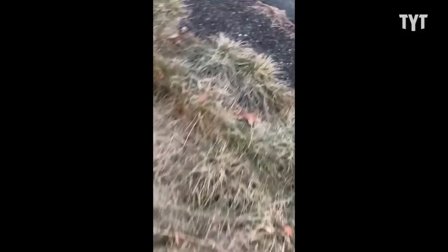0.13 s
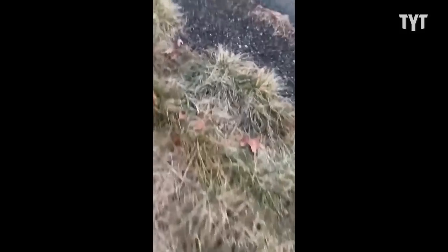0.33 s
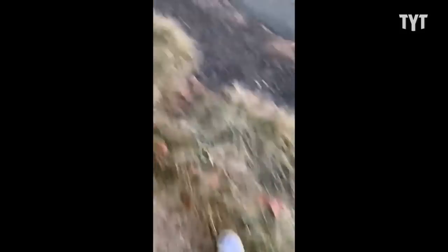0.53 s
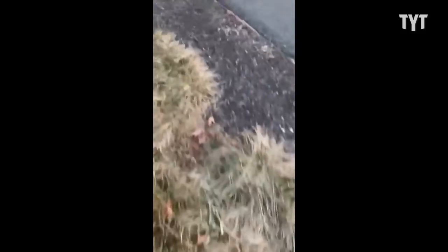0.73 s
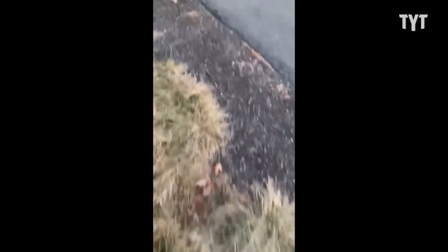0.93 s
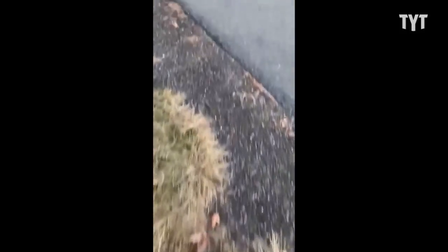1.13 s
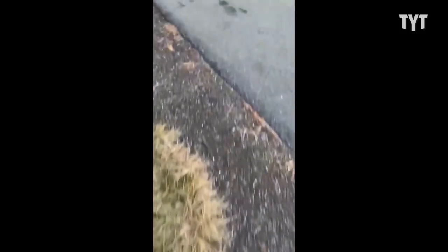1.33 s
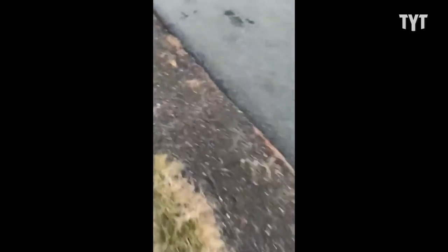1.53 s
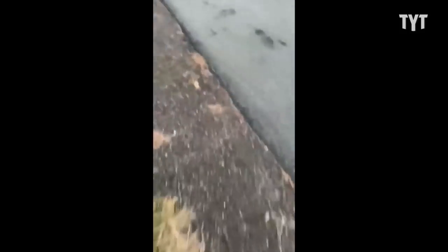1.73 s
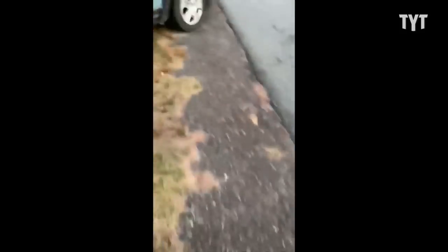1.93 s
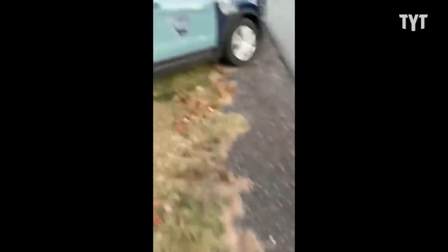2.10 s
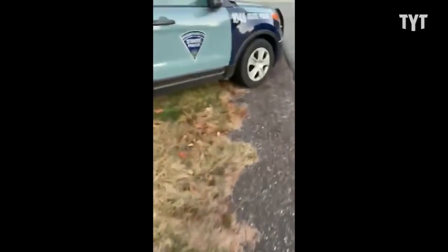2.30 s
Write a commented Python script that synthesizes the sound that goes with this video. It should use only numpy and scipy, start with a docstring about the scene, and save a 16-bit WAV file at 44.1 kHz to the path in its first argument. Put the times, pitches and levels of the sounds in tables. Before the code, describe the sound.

Busy highway traffic, cutting in abruptly at 0.1 s after silence. Deep, lumpy rumble and breeze run under steady tyre roar. Dry grass swishes and crackles underfoot, strongest around 0.6, 1.0-1.25, 1.7 and 2.25 s. A faint low engine drone swells near 0.4 s, others around 1.5, 1.85 and 2.2 s. From 1.1 s a vehicle's roar swells left, drifting slightly right after 2.1 s.

```python
"""A walker stands in roadside grass close to a busy highway, with a hand-held two-port microphone.
After a moment of silence the sound cuts in abruptly: far traffic and breeze as deep lumpy noise, tyre roar as
noise humped near 700 Hz, and feet in dry grass as clicks over a swish. Engine drones, narrow wavering tones,
swell and fade, one early and three later. Past one second the lower roar of a vehicle swells and swings
to the left, then drifts back to slightly right; the upper roar of all lanes stays put."""
import sys
import numpy as np
from scipy import signal
from scipy.fft import rfft, irfft, next_fast_len
from scipy.io import wavfile

SR = 44100
rng = np.random.default_rng(int(sys.argv[2]) if len(sys.argv) > 2 else 0)


def persist_wave(psi):
    """Save psi, clipped to +-1, as 16-bit WAV."""
    counts = np.round(np.clip(psi, -1, 1) * 32767).astype(np.int16)
    wavfile.write(sys.argv[1], SR, np.atleast_2d(counts).T)


def undo_db(level):
    """Turn decibels back into plain size, where 20 dB means ten times bigger."""
    steps = np.asarray(level, float) / 20
    return 10 ** steps


N = 108441
SIZE = next_fast_len(N)
HZ = np.arange(SIZE // 2 + 1) * SR / SIZE + 1e-3   # the small offset keeps the logarithm finite

START_S, OPENING_S = .1028, 0.00049   # end of the silence, length of the fade-in

# Far traffic and breeze. Each row: time in seconds, level in dB before a small trim.
RUMBLE_LEVEL = [(0.11, -27), (0.14, -30.5), (0.64, -28.5), (0.66, -30), (1.25, -28.5), (1.28, -30),
                (1.42, -26), (1.96, -28.5), (2.13, -31.5), (2.19, -27), (2.21, -31), (2.45, -31.5)]
# Spectrum of the far rumble. Each row: frequency in Hz, relative density in dB per Hz.
RUMBLE_COLOUR = [(11, -50), (25, -22), (36, -17), (54, -1), (119, -2), (151, 0.5), (331, -7), (376, -7.5),
                 (409, -11), (520, -16), (680, -65), (1140, -120)]

# Lower tyre roar of the near vehicle. Each row: time in seconds, level in dB before a fixed lift,
# left over right in dB.
VEHICLE_PASS = [(0.11, -39.5, -5), (0.16, -43, -2), (0.5, -43.5, 3), (0.64, -40, 0.5), (0.78, -43, 0.5),
                (1.13, -36.5, 5.5), (1.24, -34, 4), (1.32, -38, 5), (1.63, -36, 6), (1.9, -37.5, 3.5),
                (2.08, -39, 0), (2.25, -38, -1), (2.45, -37.5, -2)]
# Upper tyre roar from many tyres in all lanes. Each row: time in seconds, level in dB before a fixed lift,
# sizzle of the tread in dB, used relative to its mean.
ALL_LANES = [(0.11, -44.5, 0.5), (0.27, -47, 2), (0.6, -45.5, 4), (0.85, -45.5, 2.5), (1.11, -44.5, 4),
             (1.4, -45.5, 1.5), (1.68, -43, 1.5), (1.84, -45.5, 1), (2.1, -45, 0.5), (2.3, -45, 2.5),
             (2.45, -47, 4.5)]
# Spectrum of the tyre roar. Each row: frequency in Hz, relative density in dB per Hz.
ROAR_COLOUR = [(300, -75), (450, -16.5), (560, -5.5), (690, -1), (900, -5), (1300, -11.5), (1600, -10),
               (1900, -10), (2500, -16), (3200, -21), (4500, -28.5), (6500, -30.5), (8000, -49),
               (12000, -64)]
PAN_TOP_HZ = 790        # only the roar below this swings from side to side
ALL_LANES_PAN_DB = -1   # left over right: the upper roar leans right
SIZZLE_HZ, SIZZLE_WIDTH_HZ = 2320, 250

# Pressure of the stride in dry grass. Each row: time in seconds, level in dB before a fixed lift.
STRIDE = [(0.11, -45.5), (0.19, -49.5), (0.27, -62), (0.32, -56.5), (0.39, -62.5), (0.48, -66),
          (0.5, -55.5), (0.63, -44.5), (0.66, -50.5), (0.83, -49.5), (0.87, -56), (0.98, -59.5),
          (1.01, -46), (1.05, -51), (1.1, -44), (1.14, -48.5), (1.24, -43), (1.43, -56), (1.6, -60.5),
          (1.63, -47), (1.66, -51), (1.68, -43), (1.73, -47.5), (1.77, -55), (1.81, -50), (1.93, -69),
          (2.25, -48), (2.34, -50.5), (2.39, -59), (2.45, -55)]
# Spectrum of the grass. Each row: frequency in Hz, relative density in dB per Hz.
GRASS_COLOUR = [(1200, 2), (2500, 0.5), (4000, -1.5), (5500, 0.5), (7500, 1.5), (9500, 5), (11500, 2),
                (13000, -14.5)]
SNAPS_PER_S = 4000      # typical rate on each side; it wanders
SNAP_SPREAD_DB = 3.5    # mean of the exponential spread of snap sizes, before its cap
SWISH_DB = -0.5         # smooth swish relative to the snaps

# Engine drones. Each row: pitch in Hz, width of its waver in Hz, time of the peak in seconds,
# spread of the swell in seconds, peak level in dB about which it wanders.
ENGINE_DRONES = [(161.5, 1.5, 1.49, 0.38, -37.5), (378, 9.2, 1.855, 0.19, -38),
                 (146, 3.7, 2.19, 0.15, -38.5), (143, 4.05, 0.41, .2, -41)]

# Left-right likeness of the noise by frequency. Each row: frequency in Hz, likeness from 0 to 1.
LIKENESS = [(60, 1), (120, 1), (170, 1), (250, 0.98), (310, 0.98), (460, 0.84), (690, 0.43), (1100, 0.42),
            (1600, 0.56), (2400, 0.48), (3400, 0.26), (4200, 0.52), (4800, 0.5), (5300, 0.5), (6300, 0.5),
            (8000, 0.1), (12000, 0.47)]
# Stereo phase of the noise by frequency. Each row: frequency in Hz, left minus right in radians.
STEREO_PHASE = [(250, 0), (690, -.6), (1120, .1), (2070, 1.2), (2580, 2.6), (3100, .9), (3360, .2),
                (3960, 3.0), (5340, 3.2), (5940, 5.9), (7000, 6.2), (12000, 6.3)]


def rms_one(x):
    """Scale to rms 1, over both channels together if there are two."""
    return x / np.sqrt(np.mean(x ** 2) + 1e-20)


def in_time(rows):
    """Columns of a table as straight lines in time."""
    s, *columns = np.transpose(rows)
    return [np.interp(np.arange(N) / SR, s, c) for c in columns]


def at_hz(points):
    """A table of (Hz, value) read at every frequency, straight over log frequency."""
    hz, value = np.transpose(points)
    return np.interp(np.log(HZ), np.log(np.maximum(hz, 1)), value)


def drift(rate):
    """Slow chance of spread 1: noise through two equal low-pass poles at rate in Hz."""
    # made at every 40th sample, after a run-in of 2000 steps
    r = np.exp(-80 * np.pi * rate / SR)
    slow = signal.lfilter([1], [1, -2 * r, r * r], rng.standard_normal(N // 40 + 2002))[2000:]
    slow = rms_one(slow - slow.mean())
    return np.interp(np.arange(N) / 40, np.arange(len(slow)), slow)


def stereo_pair(shared, other):
    """Left and right spectra: a shared part plus an unrelated part in opposition, turned apart in phase."""
    alike = np.clip(at_hz(LIKENESS), 0, 1)
    common = np.sqrt(1 + alike) * rfft(shared, SIZE)
    opposed = np.sqrt(1 - alike) * rfft(other, SIZE)
    turn = np.exp(.5j * at_hz(STEREO_PHASE))   # half the phase to each side
    return np.array([(common + opposed) * turn, (common - opposed) / turn])


def patchy(spectra, colour, patchy_db, rate):
    """Colour the pair, then let overlapping half-octave bands flicker, partly together; rms 1."""
    shaped = spectra * undo_db(at_hz(colour))
    together = drift(rate / 2)
    lowest, highest = np.log2(colour[0][0]) // 1, np.log2(colour[-1][0]) + 1
    out = 0
    for centre in np.arange(lowest, highest, .5):   # in octaves above 1 Hz
        window = np.cos(np.pi * np.clip(np.log2(HZ) - centre, -.5, .5)) ** 2
        band = irfft(shaped * window, SIZE)[:, :N]
        out = out + band * undo_db(patchy_db * (.5 * together + drift(rate)))
    return rms_one(out)


def rumble():
    """Far engines and breeze merge into deep, lumpy noise."""
    db, = in_time(RUMBLE_LEVEL)
    noise = stereo_pair(*rng.standard_normal((2, N)))
    return undo_db(db - 0.27) * patchy(noise, RUMBLE_COLOUR, patchy_db=-0.16, rate=13.6)


def tyre_roar():
    """Tread noise humped around 700 Hz; its lower part swells and moves across as the vehicle goes by."""
    db, pan_db = in_time(VEHICLE_PASS)
    upper_db, sizzle_db = in_time(ALL_LANES)
    noise = stereo_pair(*rng.standard_normal((2, N)))
    roar = rfft(patchy(noise, ROAR_COLOUR, patchy_db=1.15, rate=23.0), SIZE)
    # three shares of the spectrum that add up to the whole
    low_share = 1 / (1 + (HZ / PAN_TOP_HZ) ** 8)
    sizzle_share = np.exp(-.5 * ((HZ - SIZZLE_HZ) / SIZZLE_WIDTH_HZ) ** 2)
    upper_share = 1 - low_share - sizzle_share
    low, sizzle, upper = (irfft(roar * share, SIZE)[:, :N] for share in (low_share, sizzle_share, upper_share))
    upper = rms_one(upper + sizzle * undo_db(sizzle_db - sizzle_db.mean())) * undo_db(4.0)
    sides = np.array([[.5], [-.5]])   # left, right
    all_lanes = upper * undo_db(upper_db + ALL_LANES_PAN_DB * sides)
    vehicle = low * undo_db(db + 5.5 + pan_db * sides)
    return all_lanes + vehicle


def grass():
    """Blades snap in dense uneven clicks over a smooth swish, both under the stride."""
    db, = in_time(STRIDE)
    sizes_db = SNAP_SPREAD_DB * np.minimum(rng.exponential(1, (2, N)), 5)
    sizes = undo_db(sizes_db) * rng.choice([-1, 1], (2, N))
    snap_chance = SNAPS_PER_S * undo_db(3.0 * drift(25.0)) / SR   # per sample
    snaps = sizes * (rng.random((2, N)) < snap_chance)
    blades = rms_one(snaps) + undo_db(SWISH_DB) * rng.standard_normal((2, N))
    return undo_db(db + 4.5) * patchy(stereo_pair(*blades), GRASS_COLOUR, patchy_db=0.46, rate=54.0)


def drones():
    """Each engine is a narrow wavering tone that swells and fades, the same left and right."""
    out, s = 0, np.arange(N) / SR
    for hz, width_hz, at, over, db in ENGINE_DRONES:
        pitch_hz = hz + width_hz / 2 * drift(6.3)
        phase = 2 * np.pi * (np.cumsum(pitch_hz) / SR + rng.random())
        tone = np.sqrt(2) * np.sin(phase)   # rms 1
        swell = np.exp(-.5 * ((s - at) / over) ** 2)
        out = out + undo_db(db + 1.35 * drift(4.7)) * swell * tone
    return out


def scene():
    """All sources together, as they reach the microphone."""
    return rumble() + tyre_roar() + grass() + drones()


def roll_off(x):
    """The treble ends steeply here."""
    return signal.sosfilt(signal.butter(12, 11780, fs=SR, output="sos"), x)


def record(dry):
    """The sound opens abruptly out of silence."""
    opening = np.clip((np.arange(N) / SR - START_S) / OPENING_S, 0, 1)
    return roll_off(dry * opening)


dry = scene()
out = record(dry)
persist_wave(out)
```